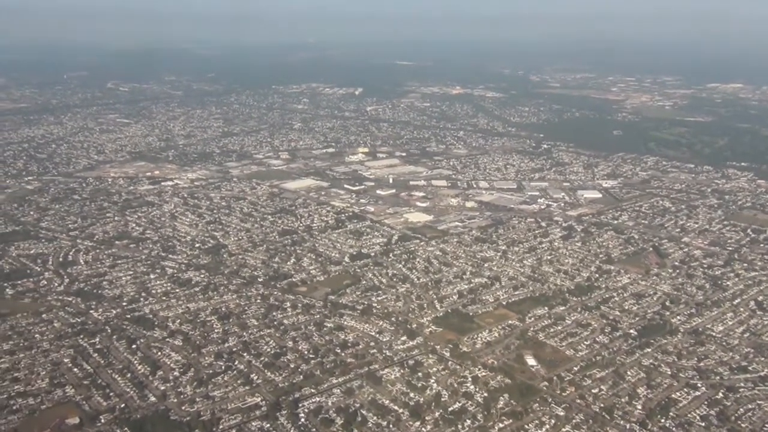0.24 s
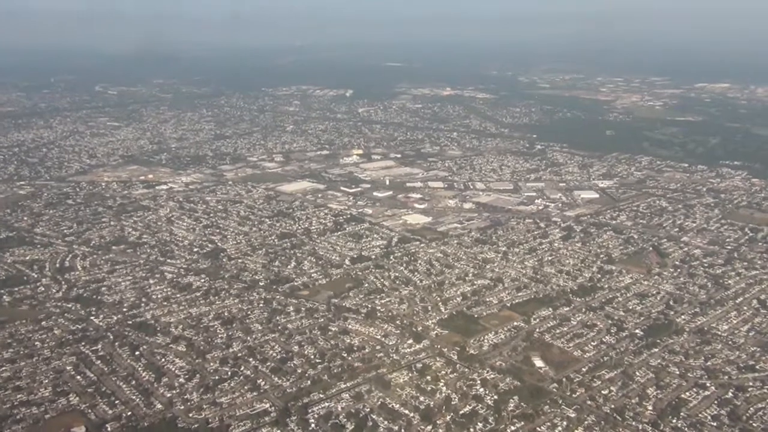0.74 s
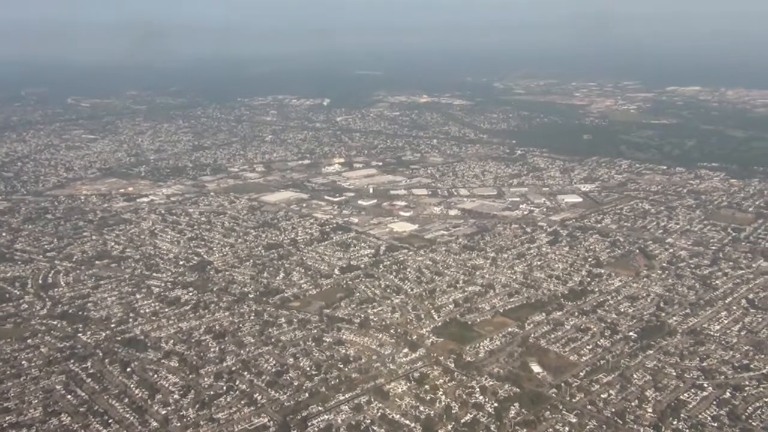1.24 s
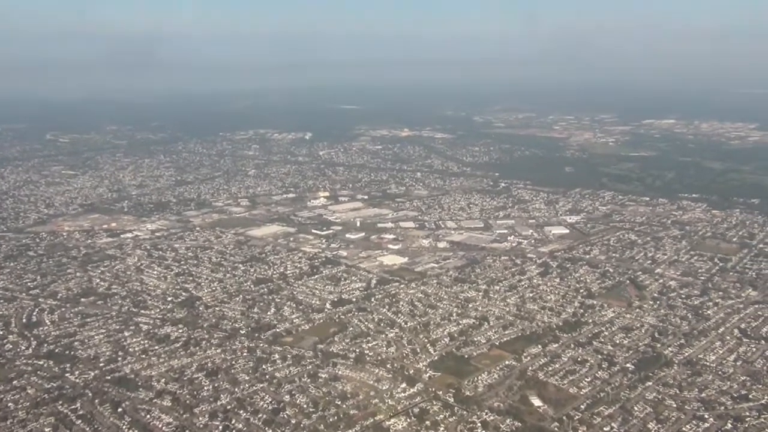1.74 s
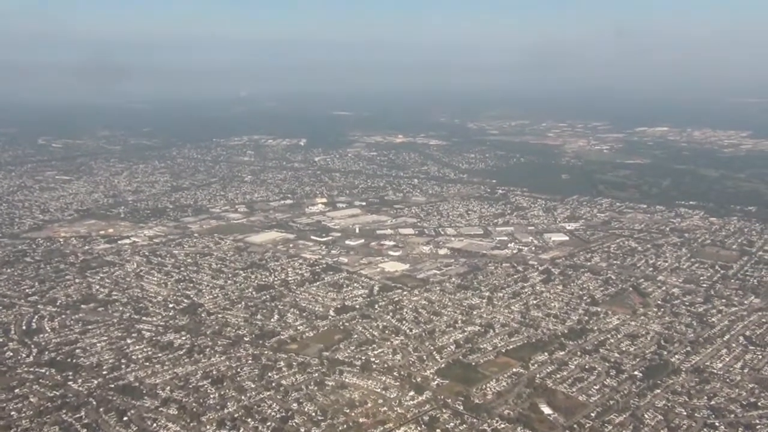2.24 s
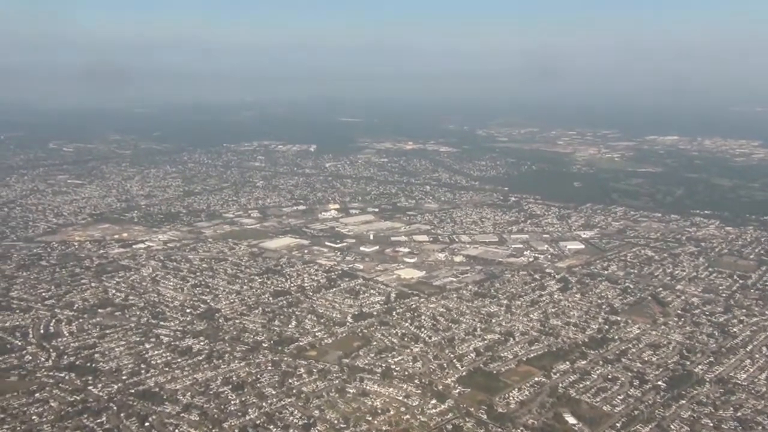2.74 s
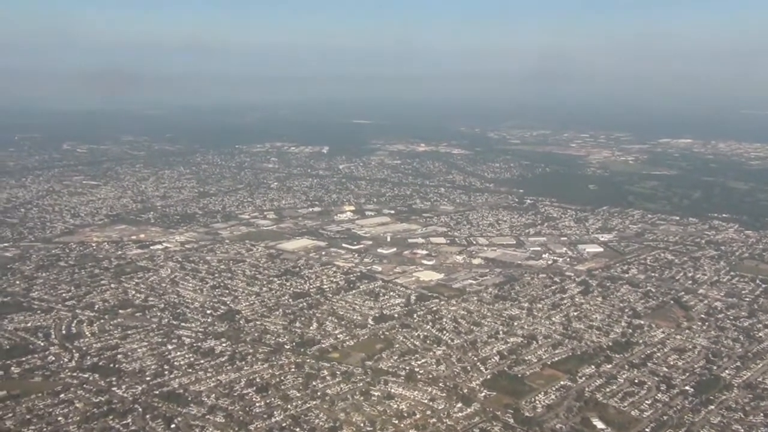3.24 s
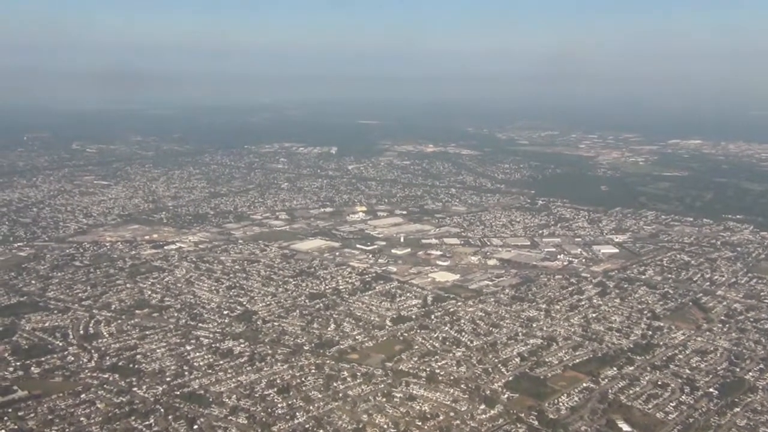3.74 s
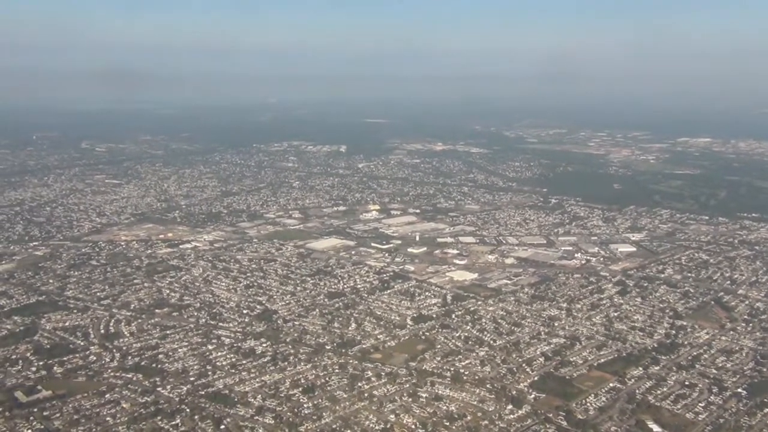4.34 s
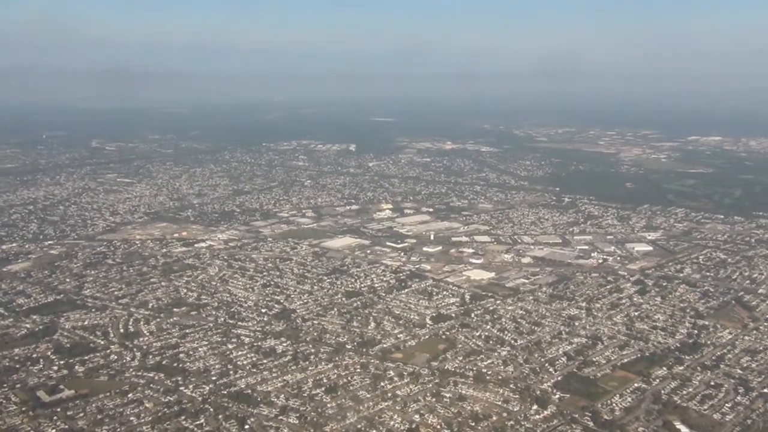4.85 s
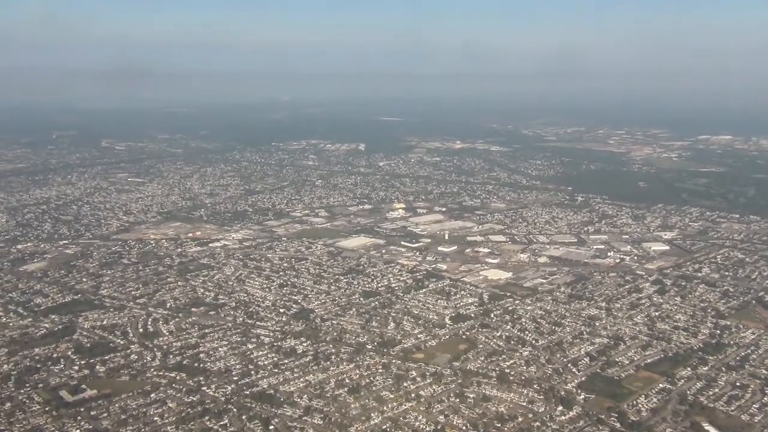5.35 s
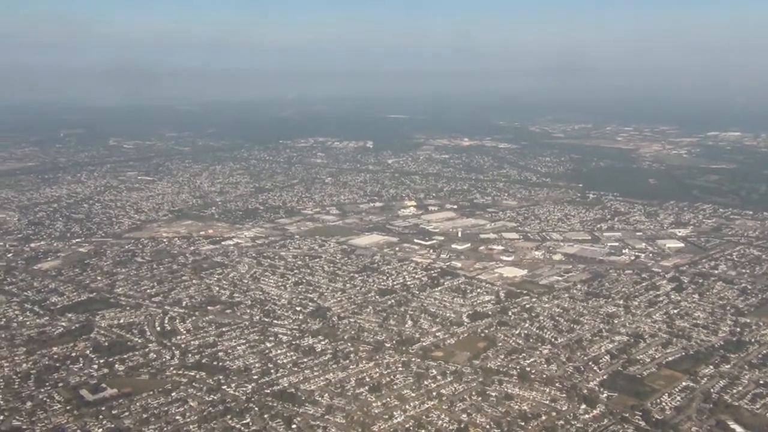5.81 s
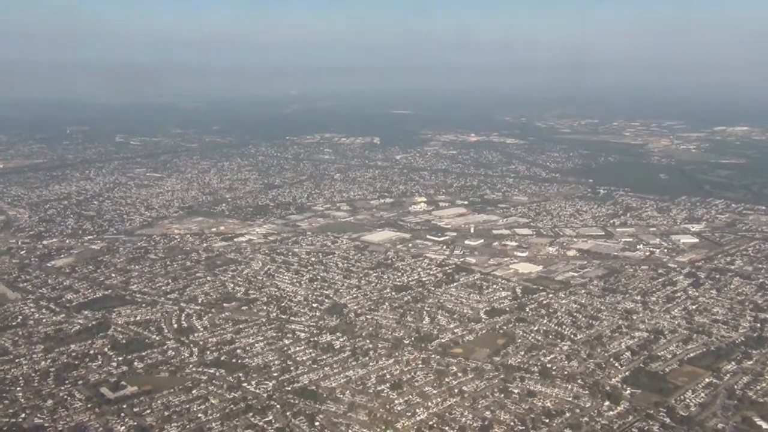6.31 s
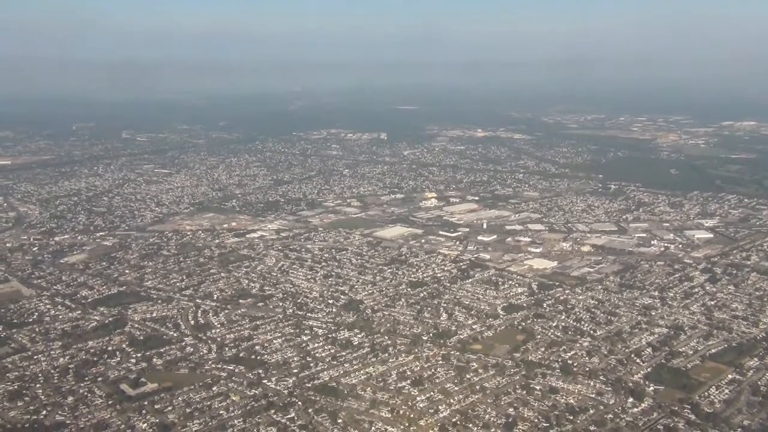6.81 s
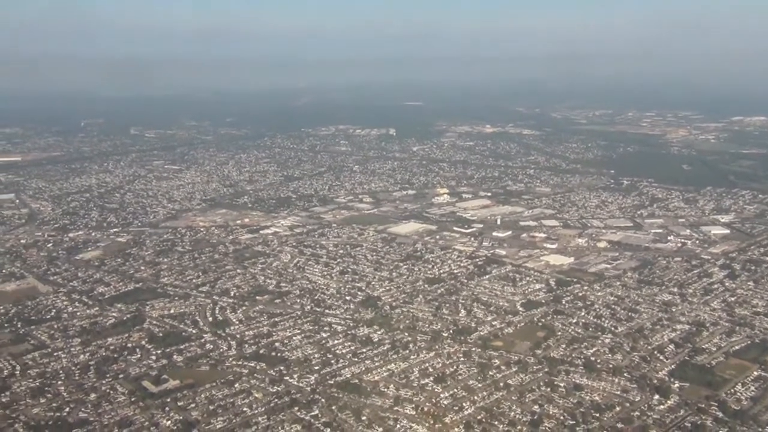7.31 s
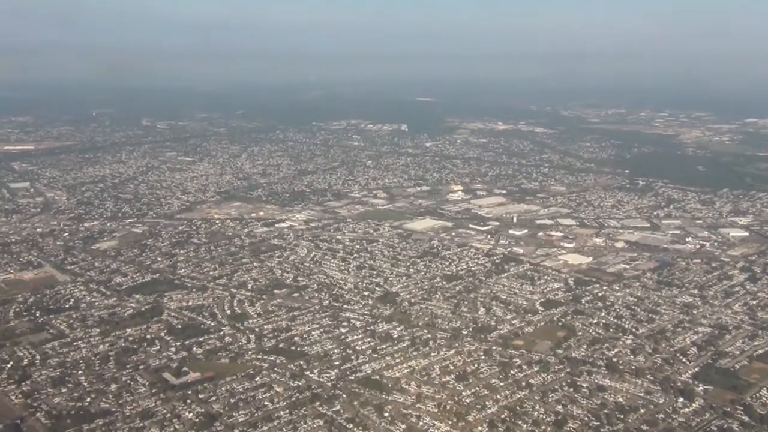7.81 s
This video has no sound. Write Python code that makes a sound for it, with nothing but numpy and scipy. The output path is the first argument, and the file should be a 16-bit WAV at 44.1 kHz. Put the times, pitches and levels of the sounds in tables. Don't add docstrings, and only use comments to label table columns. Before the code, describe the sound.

A passenger's close stereo microphone by an airliner window picks up constant engine drone and wind. Deep boom dominates, fluttering irregularly, with a low hum slowly beating and a muted rush of air above. Thin vent hiss sits far back. Past the middle, a barely audible whistle and a faint low throb join, then small plastic ticks. The roar continues unchanged to the end, cut off in flight.

```python
import sys
import numpy as np
from scipy import signal
from scipy.io import wavfile
from scipy.ndimage import uniform_filter1d, minimum_filter1d

SR = 44100
rng = np.random.default_rng(int(sys.argv[2]) if len(sys.argv) > 2 else 0)


def magnitude_from_level(level_db):
    exponent = np.asarray(level_db, float) / 20
    return 10 ** exponent


def waveform_to_disk(signal):
    frames = np.transpose(np.atleast_2d(signal))
    scaled = np.clip(frames, -1, 1) * 32767
    samples = np.round(scaled).astype(np.int16)
    wavfile.write(sys.argv[1], SR, samples)


N = 355887

# time_s, level_db
SHARED_LEVEL = [(0, -.3), (.5, -0.5), (1, 0), (1.5, 0), (1.9, .5), (2.5, 0.5), (2.9, 0.5), (3.3, 0.9),
                (3.5, -1.6), (3.9, -.6), (4.3, -0.4), (4.9, .7), (5.6, -0.1), (6.2, -0.3), (6.5, -1.1), (7, 0),
                (7.5, 0), (8.07, -1.4)]


def evened(x):
    return x / np.sqrt(np.mean(x ** 2) + 1e-20)


def smoothed(x, size, axis=-1):
    return uniform_filter1d(uniform_filter1d(x, size=size, axis=axis), size=size, axis=axis)


def read(points, hz):
    points_hz, value = np.transpose(points)
    return np.interp(np.log(hz + 1), np.log(points_hz + 1), value)


def curve(rows, column):
    rows = np.asarray(rows, float)
    return np.interp(np.arange(N) / SR, rows[:, 0], rows[:, column])


def peaks_db(hz, modes):
    return sum(db / (1 + (2 * (hz - centre_hz) / width_hz) ** 2) for centre_hz, width_hz, db in modes)


def sine(turns, db):
    return np.sqrt(2) * magnitude_from_level(db) * np.sin(2 * np.pi * turns)


def resonate(x, hz, width_hz):
    turn = np.exp(2j * np.pi * np.cumsum(hz * np.ones(len(x))) / SR)
    r = np.exp(-np.pi * width_hz / SR)
    smooth = signal.lfilter([(1 - r) ** 2], [1, -2 * r, r * r], x / turn)
    return 2 * (turn * smooth).real


def ringing_noise(hz, width_hz):
    return evened(resonate(rng.standard_normal(N), hz, width_hz))


def noise(spectrum, modes=(), size=4096, patchy_db=0.):
    frames = 4 * N // size + 5
    hz = np.fft.rfftfreq(size, 1 / SR)
    inside = (hz >= spectrum[0][0]) & (hz <= spectrum[-1][0])
    a, b, c, d, patches = rng.standard_normal((5, inside.sum(), frames))
    patches = uniform_filter1d(patches, size=14, axis=0)
    patches = evened(uniform_filter1d(patches, size=24, axis=1))
    colour_db = read(spectrum, hz) + peaks_db(hz, modes)
    level_db = colour_db[inside, None] + patchy_db * patches
    z = np.zeros((2, len(hz), frames), complex)
    z[:, inside] = np.array([a + 1j * b, c + 1j * d]) * magnitude_from_level(level_db)
    return evened(signal.istft(z, nperseg=size, noverlap=3 * size // 4)[1][:, :N])


def surging(spectrum, level_db, modes=()):
    x = noise(spectrum, modes, size=16384)
    swell_power = smoothed(x[0] ** 2, 4500)
    hold = 0.83
    return magnitude_from_level(level_db) * evened(x / swell_power ** (hold / 2))


def surges(rows):
    width_s = 0.066
    t = np.arange(0, N + 100, 100) / SR
    centre_s, db = np.transpose(rows)
    bells = np.exp(-.5 * ((t[:, None] - centre_s) / width_s) ** 2)
    return np.interp(np.arange(N) / SR, t, bells @ db)


def screens():
    # pitch_hz, level_db
    lines = [(15734.1, -68), (15747.1, -73)]
    sideband_db = [-14, -22, -19, -20, -22, -22, -24, -25]
    field_hz = 59.94
    t = np.arange(N) / SR
    first_hz, first_db = lines[0]
    comb = [(first_hz - (k + 1) * field_hz, first_db + db) for k, db in enumerate(sideband_db)]
    return sum(sine(hz * t + rng.random(), db) for hz, db in list(lines) + comb)


def power_supply():
    # start_s, pitch_hz, drift_hz_per_s
    loads = [
        (0, 15150, -190),
        (.85, 14500, -420),
        (2.08, 14840, 480),
        (2.75, 14600, -420),
        (4, 13850, 50),
        (5.05, 14900, 50),
        (5.9, 14460, -170),
        (7.6, 15050, 900),
    ]
    t = np.arange(N) / SR
    columns = np.transpose(loads)
    current = np.searchsorted(columns[0], t, "right") - 1
    start_s, pitch_hz, drift_hz_per_s = columns[:, current]
    return magnitude_from_level(-76.5) * ringing_noise(pitch_hz + drift_hz_per_s * (t - start_s), width_hz=480)


def ticks():
    # start_s, peak_db, pitch_hz, width_hz
    events = [
        (6.219, -31, 6200, 1800),
        (6.22, -34, 4400, 1800),
        (6.227, -33, 5500, 2600),
        (6.558, -31, 3100, 300),
        (6.575, -38, 3100, 300),
        (6.507, -35, 3150, 200),
        (7.34, -40, 5500, 300),
        (5.6, -37, 1950, 100),
    ]
    t = np.arange(2000) / SR
    out = np.zeros(N)
    for start_s, peak_db, hz, width_hz in events:
        puff = rng.standard_normal(len(t)) * np.exp(-t / (.004 + 1 / width_hz))
        ring = resonate(puff, hz, width_hz)
        out[round(start_s * SR):][:len(t)] += magnitude_from_level(peak_db) * ring / abs(ring).max()
    return out


def singing_panel():
    # time_s, pitch_hz, level_db
    path = [(0, 3265, -64.5), (4.9, 3276, -60), (5.2, 3316, -54.5), (6.1, 3280, -51.5), (6.4, 3280, -58.5),
            (8.07, 3280, -60)]
    return magnitude_from_level(curve(path, column=2)) * ringing_noise(curve(path, column=1), width_hz=35)


def fan_tones():
    # pitch_hz, width_hz, level_db
    tones = [(194.2, 3, -38), (2478, 8, -53), (3096, 3, -61)]
    return sum(magnitude_from_level(db) * ringing_noise(hz, width_hz) for hz, width_hz, db in tones)


def throb():
    # time_s, pitch_hz, level_db
    path = [(4.2, 35.1, -54), (4.8, 36.26, -41), (5.6, 37.95, -40), (6.5, 36.9, -33), (7.1, 35.5, -33.5),
            (8.07, 35.2, -47)]
    on = np.clip((np.arange(N) / SR - path[0][0] + .2) / .2, 0, 1)
    turns = np.cumsum(curve(path, column=1)) / SR
    return on * sine(turns, curve(path, column=2))


def pump():
    # pitch_hz, width_hz, gain_db
    pipe = [(5595, 70, 7), (5445, 20, -4)]
    set_hz, overshoot_hz = 5468, 379
    start_s, rise_s, cross_s, settle_s, hunt_s = 4.3, .5, 4.851, 1.124, 2.735
    t = np.arange(N) / SR
    u = np.maximum(t, start_s) - cross_s
    hz = set_hz + overshoot_hz * np.exp(-u / settle_s) * np.sin(2 * np.pi * u / hunt_s)
    level_db = -57.8 + peaks_db(hz, pipe)
    rise = np.clip((t - start_s) / rise_s, 0, 1) ** 2
    return rise * sine(np.cumsum(hz) / SR, level_db)


def engines():
    # time_s, speed_hz
    near_shaft = [(0, 192.06), (1.75, 192.09), (2.3, 192.75), (3.1, 193.05), (4.5, 192.97), (5.1, 192),
                  (5.7, 191.49), (6.5, 192.11), (8.07, 192)]
    # time_s, lead_turns
    lead = [(-.2, 0), (.88, 1), (2, 2), (2.8, 3), (3.45, 4), (4.2, 5), (4.75, 6), (5.6, 6.9), (6.7, 7.1),
            (7.65, 8), (8.5, 9)]
    blade_count = 11
    near_turns = np.cumsum(curve(near_shaft, column=1)) / SR
    far_turns = near_turns + curve(lead, column=1)
    return sine(near_turns, -21.8) + sine(far_turns, -29.5) + sine(blade_count * near_turns, -46.4)


def vent_hiss():
    # freq_hz, density_db_per_hz
    hiss = [(3000, -25.5), (3350, 4.5), (3650, 3), (4900, 0), (5800, -2), (6900, -6), (7900, -9),
            (8800, -11.5), (9900, -10.5), (10200, -14), (11100, -18), (12900, -18.5), (13700, -26),
            (15800, -23.5)]
    # pitch_hz, width_hz, gain_db
    slots = [(4120, 86, -0.5), (4720, 250, 2), (5400, 530, 3), (6500, 500, 5), (7270, 300, 3),
             (9250, 630, 2.5), (11700, 910, 4.5)]
    opening_db_per_s, follow_db_per_db = 0.23, 1.1
    t = (np.arange(N) - N / 2) / SR
    level_db = -46 + follow_db_per_db * curve(SHARED_LEVEL, column=1) + opening_db_per_s * t
    return magnitude_from_level(level_db) * noise(hiss, slots, size=1024, patchy_db=.65)


def skin_rush():
    # freq_hz, density_db_per_hz
    rush = [(220, -29), (370, -4), (423, -3), (511, -5), (645, -5), (725, -8), (845, -5.5), (1150, -16),
            (1320, -18.5), (1600, -16.5), (2000, -22.5), (2070, -21.5), (2230, -22.5), (2520, -25.5),
            (3160, -28), (4110, -72), (6950, -120)]
    # pitch_hz, width_hz, gain_db
    panels = [(421, 37, 6), (640, 60, 1.5), (1150, 130, 3.5), (1670, 100, 0.5), (1930, 60, 2),
              (2466, 40, 6), (2690, 76, 1.5), (2700, 120, 1.5), (3280, 60, 8)]
    level_db = -21 + curve(SHARED_LEVEL, column=1)
    return magnitude_from_level(level_db) * noise(rush, panels, size=2048, patchy_db=.5)


def jets():
    # freq_hz, density_db_per_hz
    sub = [(18, -30), (28, -13), (40, -6), (50, 0), (63, -1), (73, -7), (85, 1), (100, -10), (120, -40)]
    low_boom = [(47, -38), (80, -14), (98, -3.5), (113, 6), (156, -2), (185, -2), (240, -30.5), (410, -120)]
    between = [(172, -23), (182, 9.5), (203, -13), (212, -32.5)]
    high_boom = [(120, -30), (200, -12.5), (221, -8.5), (278, -1), (302, 0.5), (326, -1.5), (377, -13),
                 (390, -19), (510, -49.5), (860, -120)]
    # pitch_hz, width_hz, gain_db
    cabin = [(225, 25, -2), (258, 20, 1.5), (276, 14, -2), (303, 30, 1.5), (385, 25, -3)]
    # centre_s, swell_db
    low_gusts = [(.15, -3.5), (.72, 2.5), (.92, -6.5), (1.1, 3), (1.35, 1.5), (2.1, 2.5), (2.3, -3.5),
                 (2.58, 5), (3.03, 2.5), (3.4, 5.5), (4.15, 2), (4.4, 4.5), (4.65, -3.5), (5.0, 2.5),
                 (5.33, -2.5), (5.55, 3.5), (6.5, 4), (6.9, 3), (7.07, -4), (7.95, -2.5)]
    high_gusts = [(.75, -2), (1.28, 1), (1.55, -2), (1.71, -4.5), (1.86, 1.5), (2.0, -3), (2.25, 2.5),
                  (2.42, -1.5), (3.32, 1.5), (3.57, -2.5), (4.07, 2), (5.05, 2.5), (5.75, -1.5), (6.2, 2.5),
                  (6.47, -3.5), (7.75, 2.2), (7.92, -0.5)]
    follow_db_per_db = 0.73
    shared_db = follow_db_per_db * curve(SHARED_LEVEL, column=1)
    low = surging(low_boom, -17 + shared_db + surges(low_gusts))
    high = surging(high_boom, -13 + shared_db + surges(high_gusts), cabin)
    return low + high + magnitude_from_level(-31) * noise(sub, size=16384) + surging(between, -30.5)


def port_pair(common, differing):
    # freq_hz, left_minus_right_db
    balance = [(30, -2.5), (70, -1), (130, -3), (200, 1.2), (265, 1.07), (370, -0.1), (480, 2.5),
               (620, 1.1), (850, 3), (1500, 0.55), (2100, 2), (2750, 2.5), (3250, -3), (3800, 0.8)]
    # freq_hz, level_db re common
    diffuse = [(30, -20.5), (100, -28.5), (400, -23), (1500, -25), (2900, -21.5), (3400, -22.5),
               (4200, -22), (5100, -16), (7000, -12), (8800, -6.5), (9100, -14.5), (10000, -15),
               (10400, -34), (15000, -35.5)]
    # time_s, left_minus_right_db
    sway = [(0, -2), (.4, 0), (1.5, -1.5), (2.2, 1), (2.6, 0), (3.6, -1), (4.7, 0.5), (5.5, -0.5),
            (8.07, 0.5)]
    hz, t, z = signal.stft(np.array([common, differing]), SR, nperseg=2048)
    drift = uniform_filter1d(rng.standard_normal(z[0].shape), size=4, axis=0)
    drift = evened(uniform_filter1d(drift, size=12, axis=1))
    sway_db = np.interp(t, *np.transpose(sway)) * (hz < 400)[:, None]
    balance_db = read(balance, hz)[:, None] * (1 + 0.57 * drift) + sway_db
    lean = np.tanh(balance_db * np.log(10) / 40)
    side = z[0] * lean + z[1] * magnitude_from_level(read(diffuse, hz))[:, None]
    side = signal.istft(side, SR, nperseg=2048)[1][:N]
    return np.array([common + side, common - side])


def scene():
    common, differing = jets() + skin_rush() + vent_hiss()
    common = common + engines() + pump() + throb() + fan_tones() + singing_panel()
    common = common + screens() + power_supply() + ticks()
    return port_pair(common, differing)


def drop_faint_side(x, under_db, from_hz):
    mid_side = np.array([x[0] + x[1], x[0] - x[1]]) / 2
    hz, _, (mid, side) = signal.stft(mid_side, SR, nperseg=1024)
    mid_level = smoothed(smoothed(abs(mid), 1, axis=0), 1, axis=1)
    mid_level = uniform_filter1d(uniform_filter1d(mid_level, size=9, axis=0), size=9, axis=1)
    side_level = uniform_filter1d(uniform_filter1d(abs(side), size=2, axis=0), size=3, axis=1)
    faint = (side_level < magnitude_from_level(under_db) * mid_level) & (hz > from_hz)[:, None]
    lost = signal.istft(side * faint, SR, nperseg=1024)[1][:N]
    return x - np.array([lost, -lost])


def roll_off(x):
    return signal.sosfilt(signal.butter(12, 15790, fs=SR, output="sos"), x)


def record(dry):
    peak = -minimum_filter1d(-abs(dry).max(0), size=801)
    gain = smoothed(np.minimum(1, .96 / (peak + 1e-9)), 401)
    mix = drop_faint_side(dry * gain, under_db=-21, from_hz=1100)
    return roll_off(mix)


dry = scene()
out = record(dry)
waveform_to_disk(out)
```